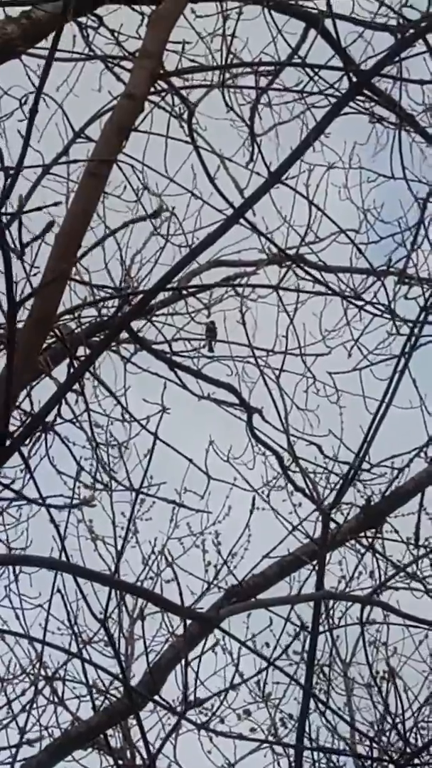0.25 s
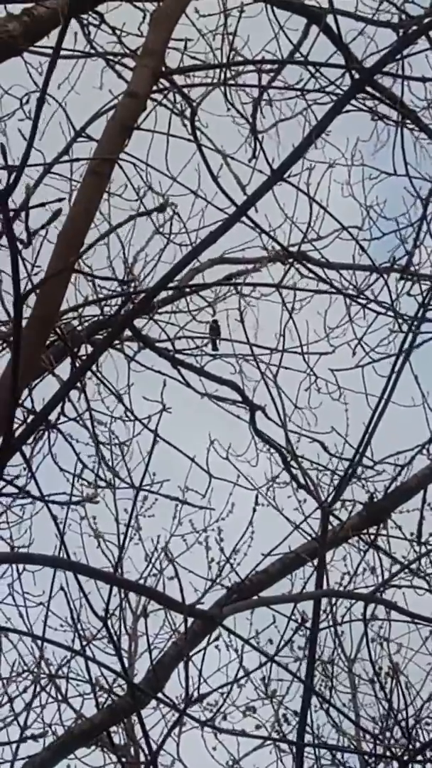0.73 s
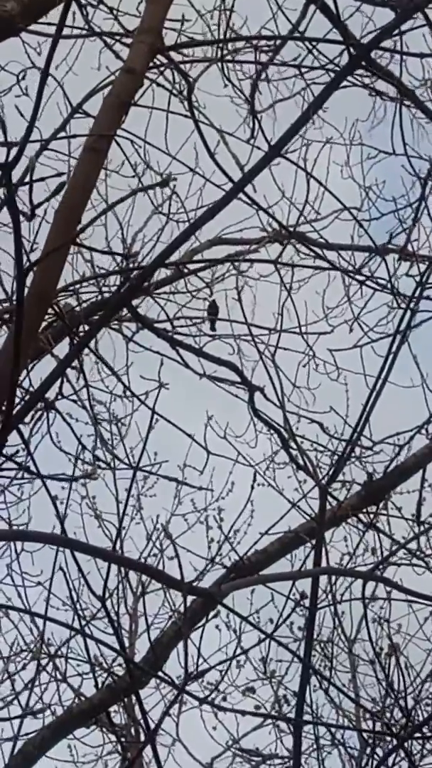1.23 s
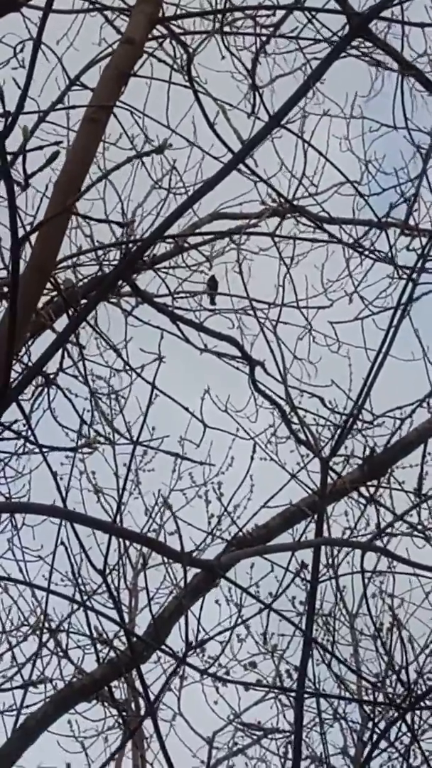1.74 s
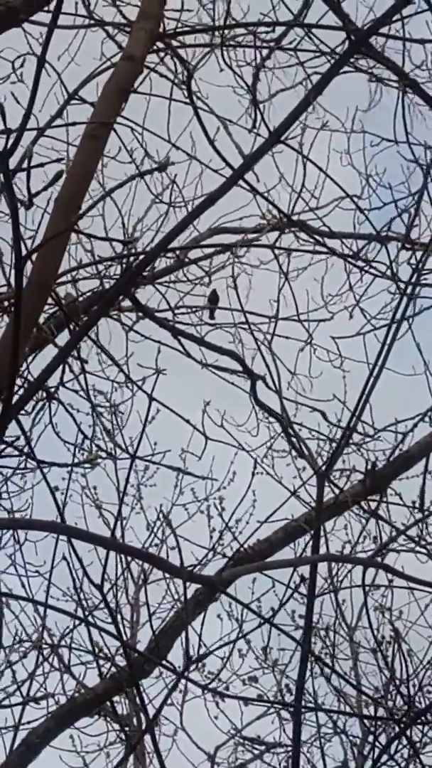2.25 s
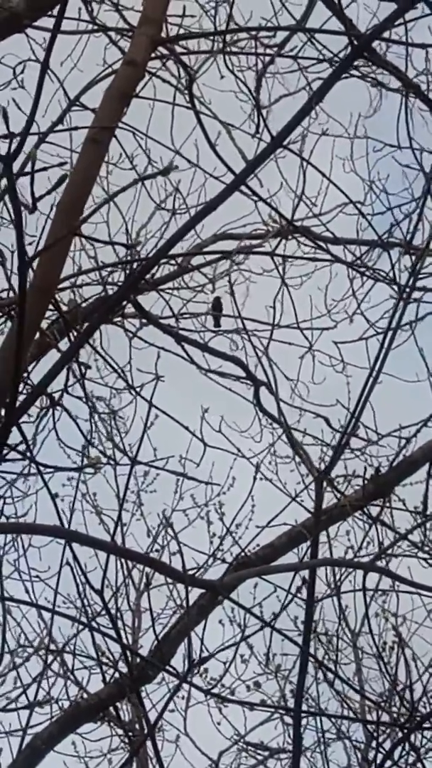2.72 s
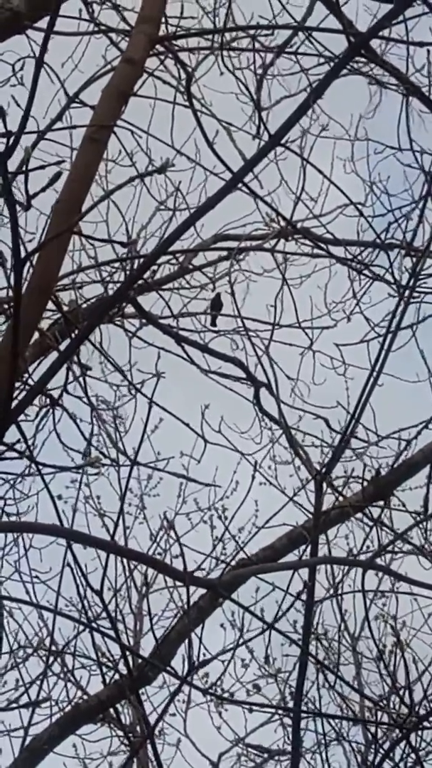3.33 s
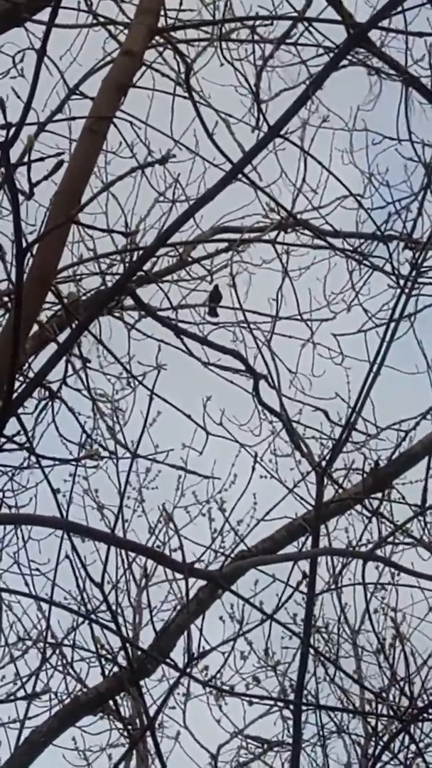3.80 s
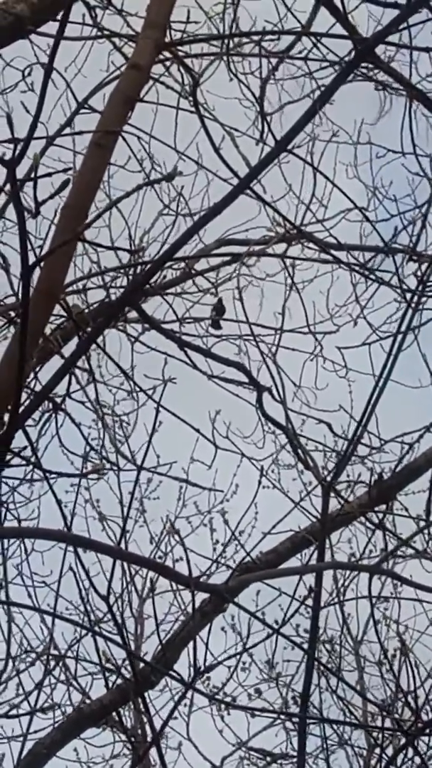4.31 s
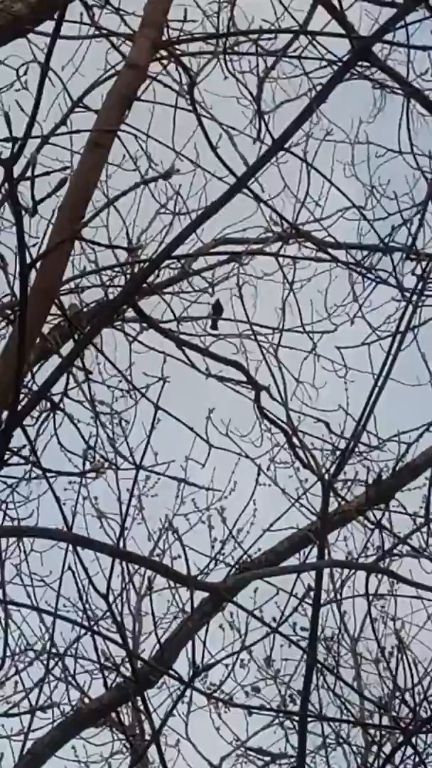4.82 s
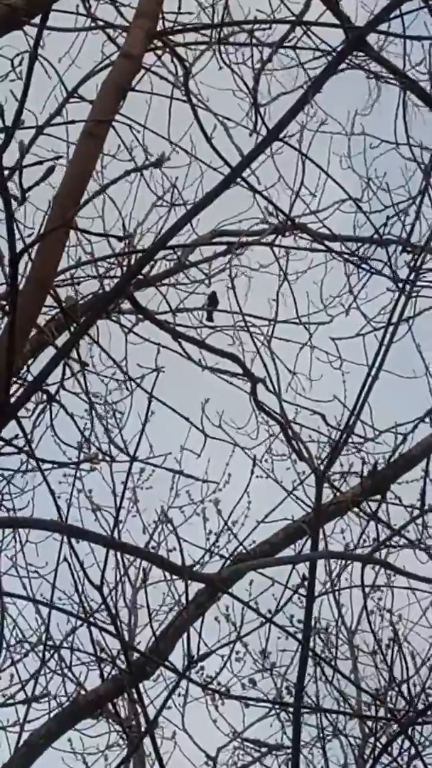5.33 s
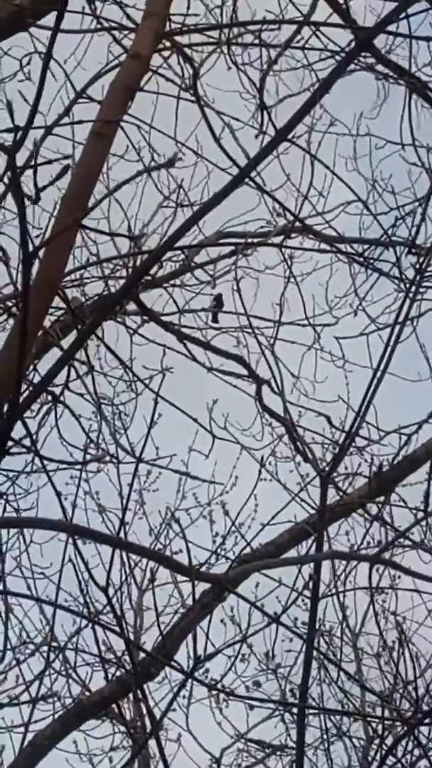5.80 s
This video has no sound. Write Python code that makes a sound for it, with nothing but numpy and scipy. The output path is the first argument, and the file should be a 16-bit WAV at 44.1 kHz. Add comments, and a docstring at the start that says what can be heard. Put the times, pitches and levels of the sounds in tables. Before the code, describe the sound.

Over a soft traffic rush, sparse dry bird calls lead to one bright song: clicking notes, rapid warble, harsh buzzing trill, low fading whistle.

```python
"""Blackbird singing among bare trees

A red-winged blackbird sings from a treetop: a few quick notes, a fast warble, a buzzy two-voiced trill
and a pulsing closing whistle. Its voices are gliding sine tones, made rough by small random wavers.
Dry 'check' calls, built from shaky bands, and thin whistles and hoots come from near and far.
Bare trees scatter these calls as a noise-like echo. Shaped noise makes the steady rush of distant traffic.
"""
import sys
import numpy as np
from scipy import signal
from scipy.fft import rfft, irfft, next_fast_len
from scipy.io import wavfile
from scipy.ndimage import uniform_filter1d, map_coordinates

SR = 44100
rng = np.random.default_rng(int(sys.argv[2]) if len(sys.argv) > 2 else 0)


def wav_out(sig):
    """Save sig, one row per channel (or a flat mono array), as 16-bit PCM at SR to the path in sys.argv[1]."""
    wavfile.write(sys.argv[1], SR, np.round(np.clip(np.atleast_2d(sig).T, -1, 1) * 32767).astype(np.int16))


N = 266937
TIME = np.arange(N) / SR


def amp(db):
    """Turn decibels into gain."""
    return 10 ** (np.asarray(db) / 20)


def unit(x):
    """Scale a sound to rms 1."""
    return x / np.sqrt(np.mean(x ** 2) + 1e-20)


def along(points, hz):
    """Read a curve of (pitch_hz, value) points, joined by straight lines on a log pitch axis."""
    point_hz, values = np.transpose(points)
    return np.interp(np.log(hz + 1), np.log(point_hz + 1), values)


def curves(rows, at=TIME):
    """Turn every column after the first, the times, into a curve of straight lines."""
    times, *columns = np.transpose(rows)
    return [np.interp(at, times, column) for column in columns]


def gate(start, end, edge=.003):
    """Be 1 between two times and 0 outside, with soft edges."""
    inside = np.minimum(TIME - start, end - TIME)
    return np.sin(np.pi / 2 * np.clip(inside / edge, 0, 1)) ** 2


def bump(x, width):
    """A smooth bell, 1 where x is 0."""
    return np.exp(-(x / width) ** 2)


def wobble(rate):
    """A smooth random curve through `rate` random points a second."""
    return map_coordinates(rng.standard_normal(int(N * rate / SR) + 4), [TIME * rate])


def filtered(x, response):
    """Multiply the spectrum of x by a response that depends on frequency."""
    size = next_fast_len(N + SR // 2)
    return irfft(rfft(x, size) * response(np.fft.rfftfreq(size, 1 / SR)), size)[:N]


def noise(spectrum):
    """Noise of rms 1, coloured by (pitch_hz, relative level in dB) points."""
    return unit(filtered(rng.standard_normal(N), lambda hz: amp(along(spectrum, hz))))


def tone(hz):
    """A sine of rms 1 that follows a pitch curve."""
    return np.sqrt(2) * np.sin(2 * np.pi * (np.cumsum(hz) / SR + rng.random()))


def slurs(rows, edge, waver):
    """Short gliding whistles whose pitch wavers by a small share."""
    out = np.zeros(N)
    unsteady = 1 + waver * wobble(600)
    for start, length, start_hz, end_hz, db in rows:
        glide_hz = np.interp(TIME, [start, start + length], [start_hz, end_hz])
        out += amp(db) * gate(start, start + length, edge) * tone(glide_hz * unsteady)
    return out


# Short notes that open the song: start_s, length_s, start_pitch_hz, end_pitch_hz, level_db
OPENING_NOTES = [(3.463, .024, 1930, 2100, -44), (3.465, .032, 1520, 1660, -50),
                 (3.4965, .0095, 2430, 2380, -33.5), (3.496, .008, 3050, 2900, -49),
                 (3.503, .014, 2340, 2560, -40), (3.508, .016, 3000, 3300, -53),
                 (3.515, .03, 2560, 2680, -51), (3.512, .018, 4150, 4300, -62),
                 (3.522, .014, 5150, 5200, -56), (3.532, .012, 5350, 5650, -43.5),
                 (3.542, .011, 5350, 5700, -45), (3.474, .03, 6150, 6600, -67)]


def opening_notes():
    """Brief whistles, each gliding from one pitch to another, some sounding together."""
    return slurs(OPENING_NOTES, edge=.0045, waver=.025)


# Loudness of the warble's two voices before shaping: time_s, low_voice_level_db, high_voice_level_db
WARBLE_LEVELS = [(3.548, -41.5, -44), (3.588, -34.5, -49), (3.628, -36.5, -45.5), (3.666, -39.5, -55.5)]
# Colour of the warble's roughness: pitch_hz, relative_level_db
WARBLE_RASP = [(2000, -23), (2500, 5), (4500, -4), (5600, -6), (6700, -16.5), (7800, -56), (11500, -31),
               (15000, -25)]
WARBLE_START_S, WARBLE_END_S, WARBLE_CYCLE_S = 3.5449, 3.669, .00782
# The low voice swells as it arches.
ARCH_FOOT_HZ, ARCH_RISE_HZ, ARCH_DB, ARCH_DIP_DB = 2814, 628, 1, 10.5
# The high voice dives between two arches.
DIVE_HZ, DIVE_SWING_HZ, DIVE_DB, DIVE_REST_DB = 4970, 654, 3.5, -17
DIVE_AT, DIVE_WIDTH = .9, .19  # shares of a cycle


def warble():
    """The two sides of the syrinx take turns, about 128 times a second: a low arch, then a high dive."""
    low_db, high_db = curves(WARBLE_LEVELS)
    cycle = (TIME - WARBLE_START_S) / WARBLE_CYCLE_S % 1
    arch = np.sin(np.pi * cycle)
    low_hz = ARCH_FOOT_HZ + ARCH_RISE_HZ * arch + 45 * wobble(700) + 35 * wobble(120)
    low_gain = amp(low_db + ARCH_DB - ARCH_DIP_DB * (1 - arch) ** 2 + wobble(150))
    low = low_gain * (tone(low_hz) + amp(-37) * tone(2 * low_hz))

    from_dive = (cycle - DIVE_AT + .5) % 1 - .5
    high_hz = DIVE_HZ - DIVE_SWING_HZ * np.sin(2 * np.pi * from_dive) + 130 * wobble(900)
    dive = bump(from_dive, DIVE_WIDTH) + amp(DIVE_REST_DB)
    high = amp(high_db + DIVE_DB + 1.5 * wobble(150)) * dive * tone(high_hz)

    rasp = amp(low_db - 14) * noise(WARBLE_RASP)
    return (low + high + rasp) * gate(WARBLE_START_S, WARBLE_END_S)


# Loudness of the trill's two voices before shaping: time_s, low_voice_level_db, high_voice_level_db
TRILL_LEVELS = [(3.67, -42, -56), (3.684, -40.5, -55), (3.692, -42, -51.5), (4.306, -42, -50),
                (4.412, -45, -50), (4.42, -50, -50.5)]
# Two even runs of syllables with a slight hitch between them: start_s, syllable_count
SYLLABLE_RUNS = [(3.674, 17), (4.189, 8)]
# How hard the bird presses, which makes the buzz harsher: time_s, pressure (0 to 1)
PRESSING = [(3.68, 0.2), (4.05, 0.2), (4.15, 0.86), (4.42, 0.63)]
# Overtones of the buzz: multiple of its pitch, relative_level_db, gain_at_full_pressure_db
BUZZ_OVERTONES = [(6, -18, 2), (7, -6, -2.5), (8, -3, 1.5), (9, -10.5, 3), (10, -13.5, 8.5), (11, -16, 6.5),
                  (12, -13, 2), (13, -15, -0.5), (14, -22.5, -4)]
SYLLABLE_S, TRILL_START_S, TRILL_END_S = .0298, 3.668, 4.425
SAG_FROM_S, SAG_PER_S = 4.17, .22  # the pitch sinks as the song runs out (share a second)
# Two high flicks near the start of each syllable, weaker under pressure
FLICK_AT_S, FLICK_GAP_S, FLICK_WIDTH_S = .0034, .0082, .0019
FLICK_FOOT_HZ, FLICK_RISE_HZ, FLICK_DB, FLICK_REST_DB, FLICK_PRESSED_DB = 4830, 800, 1.5, -13, -2.5
# The low voice slurs down between them.
SLUR_AT_S, SLUR_WIDTH_S = .00915, .0038
SLUR_HZ, SLUR_FALL_HZ, SLUR_DB, SLUR_REST_DB = 3010, 477, -.5, -14.5
# The buzz peaks in pitch after the slur, then slides down; it gives way to the slur.
BUZZ_HZ, BUZZ_SWING_HZ, BUZZ_TOP_S = 408.6, 17, .01584
BUZZ_DB, BUZZ_DUCK_DB = -1.6, 8.5


def trill():
    """Both sides of the syrinx whistle briefly in each syllable, over a buzz whose overtones slide down."""
    starts = np.concatenate([start + SYLLABLE_S * np.arange(count) for start, count in SYLLABLE_RUNS])
    age = TIME - starts[np.maximum(np.searchsorted(starts, TIME) - 1, 0)]  # time since syllable start
    low_db, high_db = curves(TRILL_LEVELS)
    pressure, = curves(PRESSING)
    sag = 1 - SAG_PER_S * np.maximum(TIME - SAG_FROM_S, 0)

    slur = bump(age - SLUR_AT_S, SLUR_WIDTH_S)
    low_hz = SLUR_HZ - SLUR_FALL_HZ * slur * (age - SLUR_AT_S) / SLUR_WIDTH_S
    low_gain = amp(low_db + SLUR_DB + 1.3 * wobble(150)) * (slur + amp(SLUR_REST_DB))
    low = low_gain * tone(sag * low_hz + 45 * wobble(700))

    first_flick = bump(age - FLICK_AT_S, FLICK_WIDTH_S)
    second_flick = bump(age - FLICK_AT_S - FLICK_GAP_S, FLICK_WIDTH_S)
    flicks = uniform_filter1d(first_flick + second_flick, size=30)  # soften jumps between syllables
    high_hz = FLICK_FOOT_HZ + FLICK_RISE_HZ * flicks
    high_gain = amp(high_db + FLICK_DB + FLICK_PRESSED_DB * pressure + 2.1 * wobble(340))
    high = high_gain * (flicks + amp(FLICK_REST_DB)) * tone(sag * high_hz + 60 * wobble(900))

    swing = np.cos(2 * np.pi * (age - BUZZ_TOP_S) / SYLLABLE_S)
    buzz_hz = sag * (BUZZ_HZ + BUZZ_SWING_HZ * swing) + 4 * wobble(400)
    buzz = np.zeros(N)
    for multiple, db, pressed_db in BUZZ_OVERTONES:
        overtone_gain = amp(db + pressed_db * pressure + 2.4 * wobble(120))
        buzz += overtone_gain * tone(round(multiple) * buzz_hz + 9 * wobble(500))
    buzz *= amp(low_db + BUZZ_DB - BUZZ_DUCK_DB * slur)
    return (low + high + buzz) * gate(TRILL_START_S, TRILL_END_S, edge=.0071)


CLOSING_START_S, CLOSING_END_S, FIRST_DIP_S, PULSE_S = 4.431, 4.576, 4.4437, .015
CLOSING_HZ, CLOSING_DB, CLOSING_FADE_DB_PER_S = 2134, -28, 74
CLOSING_ATTACK_S, CLOSING_RELEASE_S = .022, .0076
DEEPEST_S, PULSING_WIDTH_S, STEADY_DEPTH = 4.476, .038, .27  # the pulsing is deepest early on


def closing():
    """A low whistle that starts with a rattle, pulses deeply and then steadies as it fades."""
    age = np.maximum(TIME - CLOSING_START_S, 0)
    attack = np.minimum(age / CLOSING_ATTACK_S, 1) ** 2
    swell = attack * gate(CLOSING_START_S, CLOSING_END_S, edge=CLOSING_RELEASE_S)
    depth = STEADY_DEPTH + (1 - STEADY_DEPTH) * bump(TIME - DEEPEST_S, PULSING_WIDTH_S)
    beat = np.cos(np.pi * (TIME - FIRST_DIP_S) / PULSE_S) ** 2  # 1 in each dip
    hz = CLOSING_HZ + 70 * (beat - .5) + 15 * wobble(400)
    # a second tone 300 Hz lower beats against the whistle
    rattle = amp(-11) * tone(hz - 300) * gate(4.438, 4.459, edge=.004)
    overtone = amp(-36) * tone(3 * hz + 110 * wobble(570)) * gate(4.44, 4.53, edge=.026)
    gain = amp(CLOSING_DB - CLOSING_FADE_DB_PER_S * age) * swell * (1 - depth * beat ** 2)
    return gain * (tone(hz) + rattle + overtone)


CHECK_ATTACK_S, CHECK_HOLD_S, CHECK_RELEASE_S = .00993, .013, .018
CHECK_ONSET_DB, CHECK_TOP_DB, CHECK_END_DB = -13.5, -4, -18
CHECK_FLUTTER_S, CHECK_FLUTTER_DB = .0105, 2.5  # the call throbs as it sounds
BEAK_SHUT, BEAK_OPEN = .78, 1.02  # pitch ratio of the bands, before the glide power


def checks(calls, bands, glide):
    """Harsh, irregular vibration in a few bands that rise together as the beak opens."""
    out = np.zeros(N)
    for start, db in calls:
        held = TIME - start - CHECK_ATTACK_S
        opening = np.clip(1 + held / CHECK_ATTACK_S, 0, 1) ** 2
        release = np.clip((held - CHECK_HOLD_S) / CHECK_RELEASE_S, 0, 1)
        rise_db = (CHECK_TOP_DB - CHECK_ONSET_DB) * opening
        fall_db = (CHECK_END_DB - CHECK_TOP_DB) * release
        shape_db = CHECK_ONSET_DB + rise_db + fall_db
        flutter_db = CHECK_FLUTTER_DB * np.cos(2 * np.pi * held / CHECK_FLUTTER_S)
        ratio = (BEAK_SHUT + (BEAK_OPEN - BEAK_SHUT) * opening) ** glide
        rasp = sum(amp(level) * tone(hz * ratio + width * wobble(1400)) for hz, width, level in bands)
        end = start + CHECK_ATTACK_S + CHECK_HOLD_S + CHECK_RELEASE_S
        out += amp(db + shape_db + flutter_db) * rasp * gate(start - .001, end, edge=.001)
    return out * amp(2.2 * wobble(800) - 1.5)


# The near call: start_s, level_db before shaping
NEAR_CALL = [(1.085, -35.5)]
# Bands of the near call: pitch_hz before the beak's glide, waver_hz, relative_level_db
NEAR_CALL_BANDS = [(2020, 120, -8.5), (3254, 200, -5.5), (4200, 346, -6), (4780, 290, -3.5),
                   (5960, 570, -20.5), (7540, 250, -34), (11800, 750, -35)]


def near_check():
    """One dry call close by, its bands rising clearly as the beak opens."""
    return checks(NEAR_CALL, NEAR_CALL_BANDS, glide=.8)


# The far calls: start_s, level_db before shaping
FAR_CALLS = [(.231, -48), (2.773, -48.5), (5.364, -48.5)]
# Bands of the far calls: pitch_hz before the beak's glide, waver_hz, relative_level_db
FAR_CALL_BANDS = [(2230, 200, -2), (3160, 237, 0.5), (4100, 450, -12), (6000, 750, -25.5)]
# Thin whistles of small birds: start_s, length_s, start_pitch_hz, end_pitch_hz, level_db before the air
THIN_WHISTLES = [(1.49, 0.1, 7480, 7400, -86), (1.57, 0.13, 7260, 7160, -88),
                 (1.75, 0.071, 6900, 6860, -89), (1.92, 0.047, 6960, 7020, -87),
                 (2.08, .32, 5310, 5170, -84), (2.42, .14, 5460, 5550, -94)]
# Faint hoots: start_s, length_s, start_pitch_hz, end_pitch_hz, level_db before the air
DISTANT_HOOTS = [(4.86, 0.099, 470, 442, -66), (5.12, 0.071, 530, 496, -63), (5.29, 0.098, 670, 632, -56),
                 (5.38, 0.078, 560, 524, -58.5)]


def far_birds():
    """Calls, thin whistles and faint hoots from far off, dulled because air takes the top off."""
    calls = checks(FAR_CALLS, FAR_CALL_BANDS, glide=.2)
    whistles = slurs(THIN_WHISTLES, edge=.024, waver=.012)
    hoots = slurs(DISTANT_HOOTS, edge=.023, waver=.0298)
    air = [(6800, .5), (7600, -6), (9000, -25)]  # pitch_hz, gain_db
    return filtered(calls + whistles + hoots, lambda hz: amp(along(air, hz)))


# How long the trees' tail rings on: pitch_hz, time_to_fall_60_db_s
TREE_TAIL = [(500, 0.5), (2000, 0.87), (3200, 0.91), (4100, 1), (5100, 0.66), (6500, 1), (12000, 0.16)]


def woods(x):
    """Nearby branches answer densely at once; farther trunks leave a long, weak tail."""
    hz, t, grains = signal.stft(rng.standard_normal(SR), SR, nperseg=256)
    trunks = amp(-60 * t / along(TREE_TAIL, hz)[:, None])
    branches = amp(5.5 - 60 * t / .14)
    build_up = 1 - np.exp(-t / .0037)
    tail = signal.istft(grains * (trunks + branches) * build_up, SR, nperseg=256)[1]
    tail = tail / np.sqrt(np.sum(tail ** 2))
    # twigs throw back short waves, around 4200 Hz, best: pitch_hz, gain_db
    twigs = [(2000, -5), (3100, -1), (4200, 3), (5500, -1.5), (9000, -.5)]
    return filtered(signal.fftconvolve(x, tail)[:N], lambda f: amp(along(twigs, f)))


# Colour of the traffic rush: pitch_hz, relative_level_db
TRAFFIC_COLOUR = [(250, -24.5), (400, -16), (550, -8.5), (750, -2), (950, 0.5), (1300, -1.5), (1900, -3.5),
                  (2200, -7.5), (2600, -21), (3300, -22.5), (4600, -29.5), (5200, -42), (6400, -50.5),
                  (8000, -78)]
# How loud the traffic is: time_s, level_db
TRAFFIC_FLOW = [(0.0, -50), (0.89, -50), (1.94, -50), (4.19, -48), (5.8, -48.5), (6.05, -46.5)]
# Colour of the low rumble: pitch_hz, relative_level_db
RUMBLE_COLOUR = [(20, -25.5), (35, -21), (55, -7), (90, -1), (150, -3.5), (250, -7), (400, -15), (700, -37),
                 (2500, -120)]
# A faint low drone: time_s, level_db
DRONE_LEVELS = [(4.3, -76), (4.85, -64), (5.2, -60), (5.65, -63), (6.05, -58)]


def background():
    """Shaped noise for distant traffic, its low rumble and a faint swelling drone, with a very soft hiss."""
    traffic_db, = curves(TRAFFIC_FLOW)
    traffic = amp(traffic_db + .24 * wobble(8)) * noise(TRAFFIC_COLOUR)
    drone_db, = curves(DRONE_LEVELS)
    # pitch_hz, relative_level_db
    drone_colour = [(280, -50), (440, 1), (560, 2.5), (700, -4.5), (1000, -2.5), (1500, -32), (4000, -120)]
    drone = amp(drone_db + wobble(7)) * noise(drone_colour)
    rumble = amp(-61) * noise(RUMBLE_COLOUR)
    hiss = amp(-90.5) * rng.standard_normal(N)
    return traffic + drone + rumble + hiss


def scene():
    """Add the song, the other birds, their echo from the trees and the background."""
    opening = opening_notes() + warble()
    buzz = trill()
    whistle = closing()
    call = near_check()
    far = far_birds()
    # each kind of note spreads into the trees with its own strength
    into_trees = amp(-5) * (opening + buzz) + amp(-11) * whistle + amp(-7.5) * call + amp(-6) * far
    return (opening + buzz + whistle + call + far + woods(into_trees) + background())[None]


def record(dry):
    """Keep nothing at or above 15750 Hz."""
    return filtered(dry[0], lambda hz: hz < 15750)[None]


dry = scene()
out = record(dry)
wav_out(out)
```